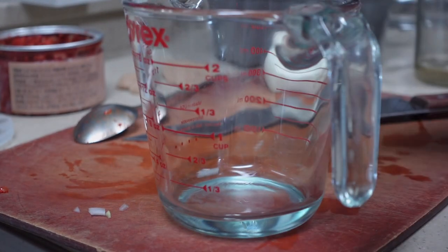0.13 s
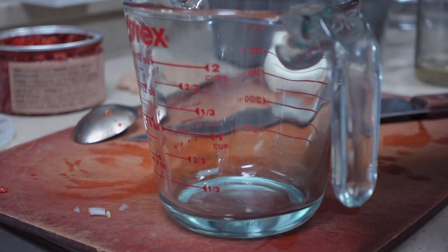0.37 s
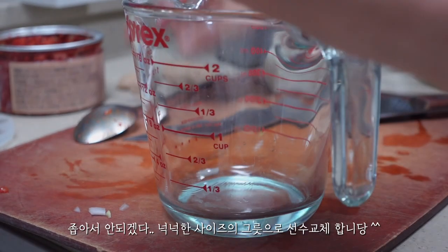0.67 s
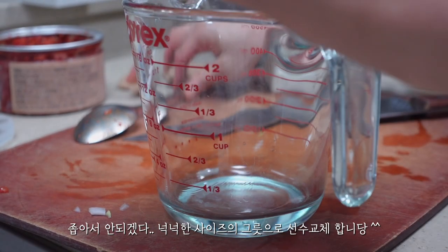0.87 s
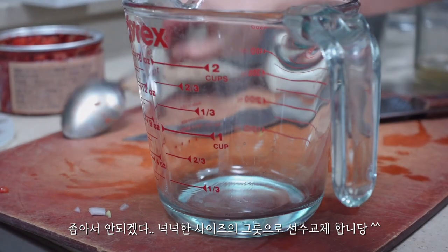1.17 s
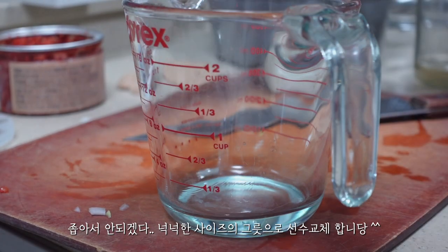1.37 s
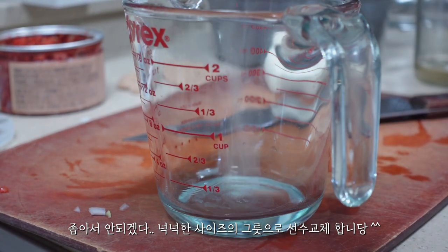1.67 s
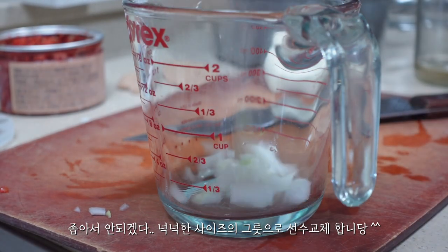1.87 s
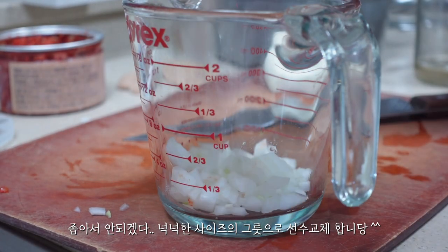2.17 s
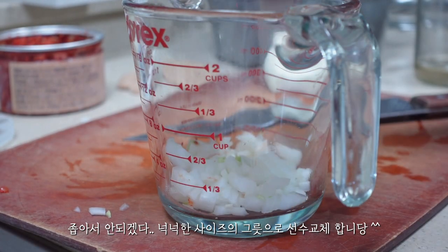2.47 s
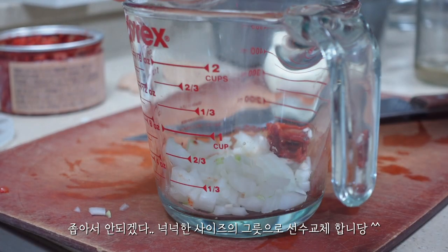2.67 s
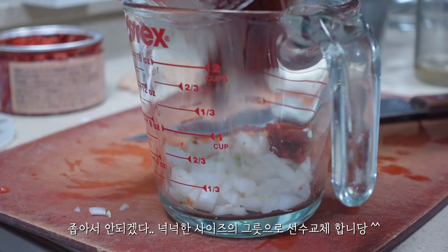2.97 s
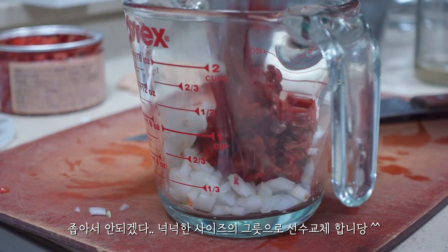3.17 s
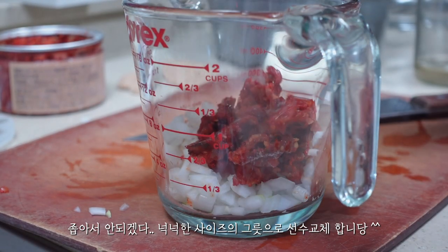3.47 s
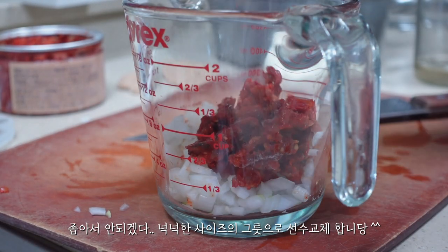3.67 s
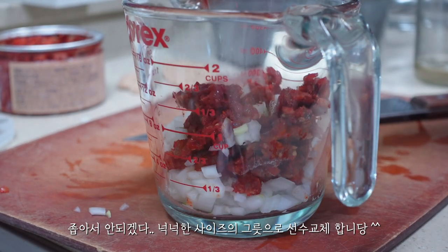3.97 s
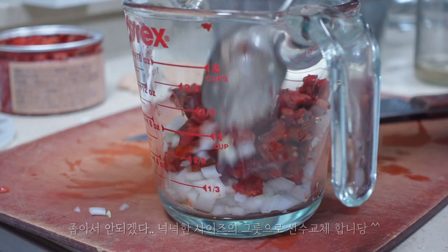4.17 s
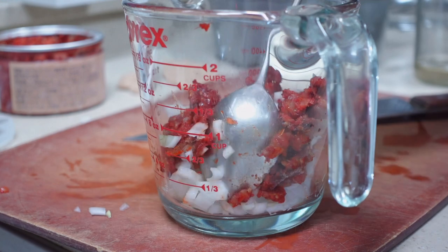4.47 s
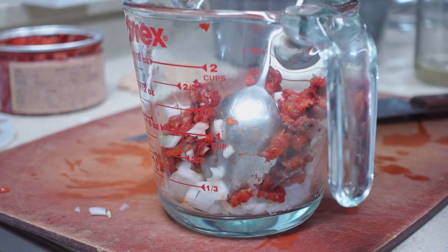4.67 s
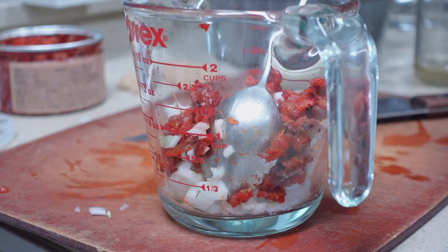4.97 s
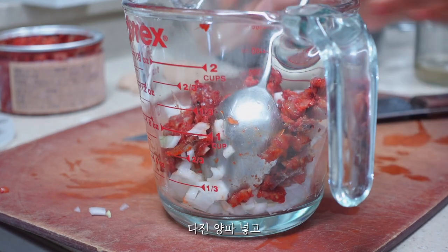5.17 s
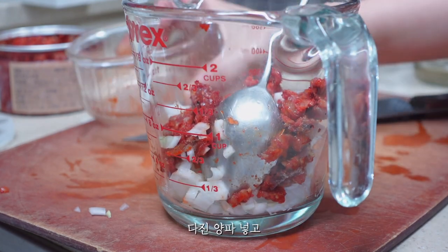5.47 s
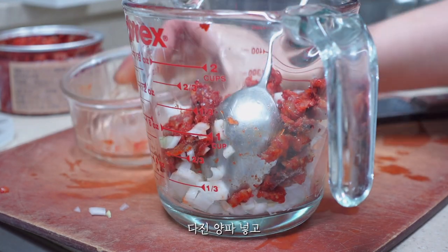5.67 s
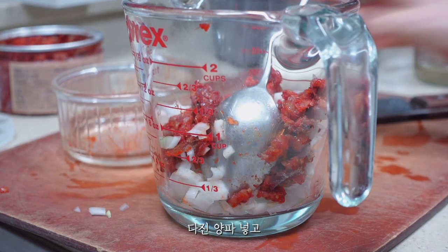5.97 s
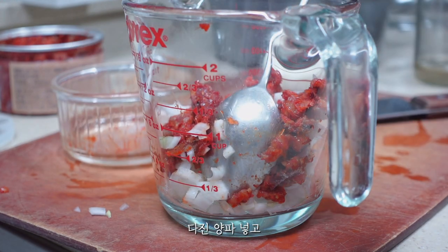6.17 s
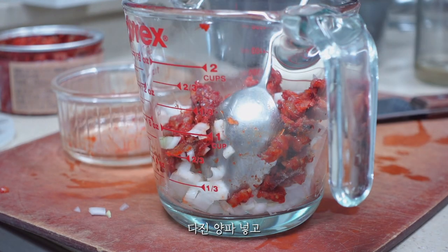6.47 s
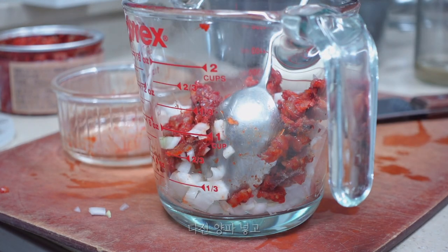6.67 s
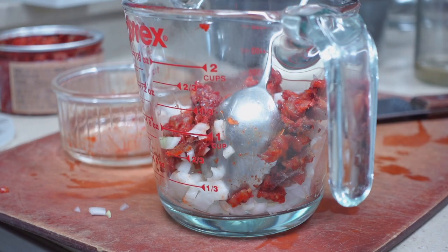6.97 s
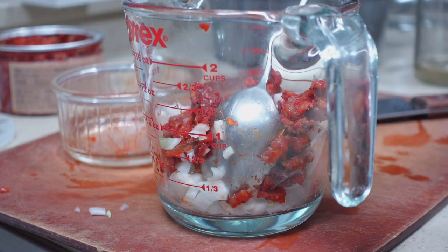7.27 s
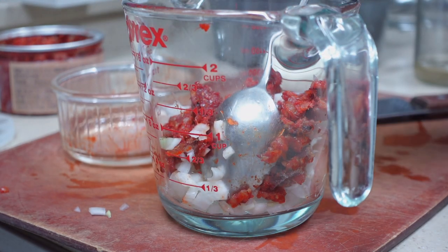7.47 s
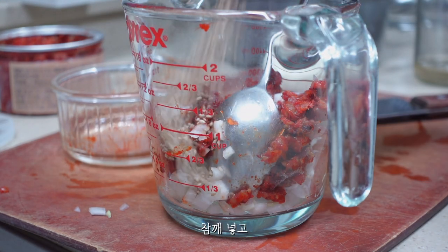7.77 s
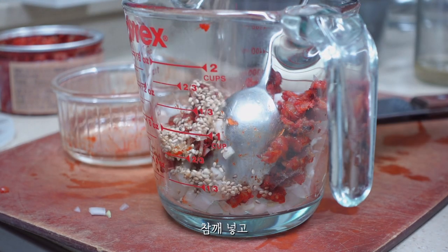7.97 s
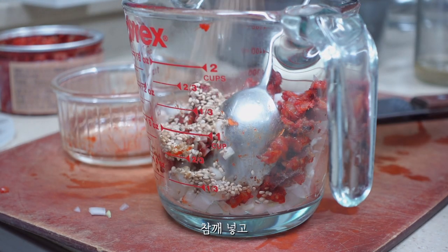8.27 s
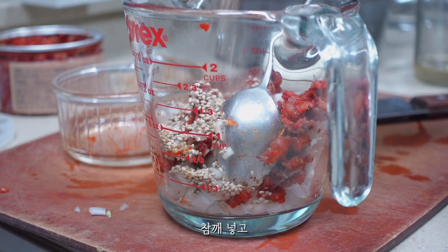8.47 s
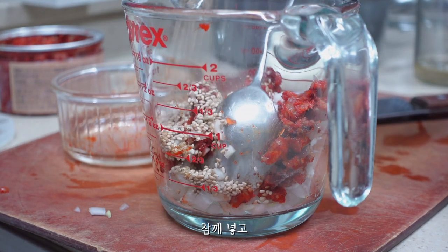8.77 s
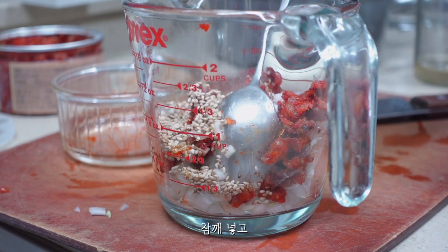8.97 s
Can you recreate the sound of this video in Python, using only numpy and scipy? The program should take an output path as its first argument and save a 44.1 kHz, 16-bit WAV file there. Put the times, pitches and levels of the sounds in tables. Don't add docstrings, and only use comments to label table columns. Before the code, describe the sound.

Close kitchen sounds: steel taps on glass, soft onion patter, sharp scraping clangs, glass dish knocking on a wooden board, then a fine seed shower.

```python
import sys
import numpy as np
from scipy import signal
from scipy.fft import rfft, irfft, next_fast_len
from scipy.io import wavfile
from scipy.ndimage import uniform_filter1d

SR = 44100
rng = np.random.default_rng(int(sys.argv[2]) if len(sys.argv) > 2 else 0)


def materialize(psi):
    bounded = np.clip(np.atleast_2d(psi).T, -1, 1)
    quanta = np.round(bounded * 32767).astype(np.int16)
    wavfile.write(sys.argv[1], SR, quanta)


def gain_from_db(level_db):
    decades = np.asarray(level_db, float) / 20
    return 10 ** decades


N = 401751
PAUSE_S = 7.072
RING_S, STROKE_S = 0.4, 1.6


def unit(x):
    return x / np.sqrt(np.mean(x ** 2) + 1e-30)


def colour(x, points):
    hz, db = np.transpose(points)
    size = next_fast_len(x.shape[-1])
    f = np.maximum(np.arange(size // 2 + 1) * SR / size, 1)
    gain = gain_from_db(np.interp(np.log(f), np.log(hz), db))
    return irfft(rfft(x, size) * gain, size)[..., :x.shape[-1]]


def pair(size, alike):
    mid, side = rng.standard_normal((2, size))
    c = np.clip(alike, 0, 1)
    spread = np.sqrt(1 - c) * side * np.array([[1], [-1]])
    return (np.sqrt(1 + c) * mid + spread) / np.sqrt(2)


def add(out, x, s):
    i = int(round(s * SR))
    out[i:i + len(x)] += x[:len(out) - i]


def gripped(hz, db, t60_s, free):
    return list(zip(hz, db, free * np.array(t60_s)))


def ring(modes):
    hz, db, t60_s = (c[:, None] for c in np.transpose(modes))
    t = np.arange(int(SR * RING_S)) / SR
    sign = (-1) ** np.arange(len(hz))[:, None]
    fade = gain_from_db(db - 60 * t / np.clip(t60_s, .005, .6))
    y = np.sum(sign * np.sin(2 * np.pi * hz * t) * fade, axis=0)
    return y / np.abs(y).max()


def strike(contacts):
    out, t = np.zeros(N), np.arange(int(SR * RING_S)) / SR
    for modes, hz, t60_s, ring_db, rows in contacts:
        body = ring(modes)
        band = signal.butter(2, [hz / 2.21, min(hz * 1.68, .45 * SR)], "band", fs=SR)
        haze = gain_from_db(ring_db - 27.0 - 60 * t / 0.9)
        fade = (gain_from_db(-60 * t / max(t60_s, .002)) + haze) / 2.5
        for s, peak_db in rows:
            crack = signal.lfilter(*band, rng.standard_normal(len(t)))
            crack = crack * fade / crack.std()
            add(out, gain_from_db(peak_db - 4.0) * (crack + gain_from_db(ring_db) * body), s)
    return out


def effort(t, rise_s, fall_s, pushes):
    s, db = np.transpose(pushes)[:, :, None]
    away = np.where(t < s, (s - t) / max(rise_s, .002), (t - s) / max(fall_s, .002))
    swell = np.sqrt(np.sum(gain_from_db(db - 20 * away) ** 2, axis=0))
    return swell * ((t < PAUSE_S) | (t[0] > PAUSE_S))


def rub(stroke, modes, ring_db, slips_hz, uneven_db, flurry_db=2.0):
    (touch_s, rise_s, fall_s, pushes), points = stroke
    t = max(touch_s, 0) + np.arange(int(STROKE_S * SR)) / SR
    chance, side, size = rng.random((3, len(t)))
    slips = (chance < slips_hz / SR) * np.sign(side - .5) * gain_from_db(-uneven_db * np.log(1.01 - size))
    steps = np.repeat(rng.standard_normal(len(t) // 400 + 1), 400)[:len(t)]
    flurry = uniform_filter1d(steps, size=200)
    force = effort(t, rise_s, fall_s, pushes) * gain_from_db(flurry_db * flurry)
    patch_db, patch_s = 3.5, 0.025
    knots, rung, energy = np.arange(t[0], t[-1] + patch_s, patch_s), 0, 0
    for hz, db, t60_s in modes:
        r, w = gain_from_db(-60 / max(t60_s, .005) / SR), 2 * np.pi * hz / SR
        patch = gain_from_db(np.interp(t, knots, patch_db * rng.standard_normal(len(knots))))
        resonator = [gain_from_db(db) * np.sin(w)], [1, -2 * r * np.cos(w), r * r]
        rung = rung + signal.lfilter(*resonator, slips * force * patch)
        energy += gain_from_db(db) ** 2 / 2 / (1 - r * r)
    rung = rung * gain_from_db(ring_db) / np.sqrt(energy * np.mean(slips ** 2))
    return rung + unit(colour(slips, points)) * force, t[0]


def rub_all(rows):
    out = np.zeros(N)
    for row in rows:
        add(out, *rub(*row))
    return out


# (frequency [Hz], level [dB per Hz])
AIR = [(25, -26.5), (238, 2), (568, -7), (1280, -4.5), (2210, -7.5), (3320, -19), (15200, -29.5),
       (16500, -45.5)]
# (time [s], level [dB])
AIR_LEVEL = [(0.0, -56.5), (7.0, -57.5), (9.11, -57.5)]


def air():
    s, db = np.transpose(AIR_LEVEL)
    swell_db = np.interp(np.arange(N) / SR, s, db - db.min())
    return unit(colour(pair(N, 0.56), AIR)) * gain_from_db(-58.5 + swell_db)


# (frequency [Hz], level [dB], t60 [s])
BOARD = [(156.5, 21, 0.072), (414, -2, 0.23), (747, -6.5, 0.024)]
# (frequency [Hz], level [dB])
SETTLE = ((0, .01, 0.17, [(0.0, -44.5)]), [(47, -40), (80, -1.5), (232, -7), (661, -19.5), (2110, -28.5),
           (4000, -35), (5200, -46), (8800, -120)])
ONION = ((1.725, 0.022, 0.16, [(1.727, -40.5), (1.85, -46), (1.96, -42.5), (2.12, -51), (2.3, -56)]),
          [(80, -49), (140, 2.5), (258, -8.5), (742, -1.5), (1490, -10.5), (2320, -6), (5630, -13),
          (15500, -20.5)])
ROCK = ((6.15, 0.029, 0.16, [(6.19, -38), (6.3, -31.5), (6.51, -48.5), (6.607, -47.5)]), [(47, -64),
         (80, -55), (145, 9.5), (307, 1.5), (498, 4.5), (709, -1), (7010, -18), (15500, -33.5)])
HAUL = ((6.75, 0.13, 0.11, [(6.82, -35), (6.9, -40), (6.98, -38), (7.055, -38.5)]), [(50, -39), (250, 4.5),
         (800, 2.5), (1500, -3.5), (3000, -11.5), (15500, -45)])


def board_rubs():
    return rub_all([(SETTLE, BOARD, -25, 5000, 2.1), (ONION, BOARD, -14, 4000, 2.5),
                    (ROCK, BOARD, -8, 1500, 2.5), (HAUL, BOARD, -14, 5000, 1.8, 1.5)])


SPOON_HZ = [1992, 2840, 4466, 4510, 4600, 5500, 7590, 11400, 13950]
SPOON_T60 = [.28, .15, .23, .12, .14, .07, .17, .12, .09]
TIP_DB = [-5, -3, 14.5, 4, -9.5, -27, -22, -11, -22]
TIP = gripped(SPOON_HZ, TIP_DB, SPOON_T60, .55)
HELD_HZ = [1529, 1988, 2805, 4468, 4515, 5550, 5700, 6400, 7590, 7634, 8680, 10560, 11400, 13950]
# (frequency [Hz], level [dB], t60 [s])
LAID = [(3860, -9, 0.087), (4870, 10, 0.16), (8000, 1, 0.05)]
SLAP = list(zip(HELD_HZ, [-14.0, -1.5, -35.5, -2.0, -5, -7.5, 3.0, -30, 2.5, -8.5, -7.5, -36.5, -17, -21.5],
        [0.068, 0.11, .1, 0.28, 0.12, 0.064, .035, .1, 0.046, 0.13, 0.066, 0.081, .1, 0.13]))
SHAKE = list(zip(HELD_HZ, [-30, -3.5, -1.0, -4.5, 1.0, -5, -13.5, -11, -6.0, -13.5, -29.5, -24, -25, -35],
         [.05, 0.037, 0.083, 0.24, 0.056, .05, 0.042, 0.098, 0.061, 0.09, .1, 0.089, .1, .08]))
PRESSED = [(4468, -2, 0.1), (2800, -6, .05), (7700, -4, .04), (12500, -17, 0.04)]
DRAWN = [(4468, -6, .06), (6450, 0, .09), (7650, -3, .05), (10700, 0, .06)]
# (frequency [Hz], level [dB])
SLIDE = ((.88, 0.044, 0.046, [(.956, -42.5)]), [(120, -50), (200, -28), (397, -4.5), (613, -14),
          (1690, -9.5), (5070, -25), (15000, -49)])
CHATTER = ((1.5, .01, 0.026, [(2.452, -46), (2.475, -48.5), (2.515, -53.5), (2.545, -52.5)]), [(900, -32.5),
            (1500, -14.5), (4500, 8.5), (5600, 9.5), (9000, -12), (15500, -29.5)])
DRAW = ((3.2, 0.031, 0.027, [(3.615, -38), (3.635, -42)]), [(400, -28), (1300, -1.5), (3000, -9),
         (8000, -29), (15500, -46)])
SCRAPE = ((3.425, 0.037, 0.087, [(3.44, -28), (3.49, -41), (3.53, -40.5)]), [(240, -58.5), (400, -31.5),
           (1280, 0.5), (3460, -11.5), (4660, -10), (7790, -13.5), (12300, -23.5), (15500, -61)])
SWIPE = ((2.8, 0.02, 0.02, [(3.644, -28.5)]), [(470, -51), (800, -35), (4600, 14), (4950, -10),
          (11000, -13), (13500, -8), (15500, -49.5)])
FLICK = ((3.765, .025, 0.042, [(3.783, -24)]), [(470, -54.5), (800, -49), (2100, 7.5), (3410, -11),
          (4540, 5.5), (7640, -13.5), (15500, -33)])


def spoon_scrapes():
    return rub_all([(SLIDE, LAID, -15, 6000, 2.1), (CHATTER, SLAP, 3, 3000, 2.2),
                    (SCRAPE, PRESSED, -6, 5000, 2.2, 1.5), (DRAW, DRAWN, 0, 4000, 2.5),
                    (SWIPE, SHAKE, -10, 6000, 2.5), (FLICK, TIP, -10, 6000, 2.5)])


EDGE_DB = [4.5, -30.5, -18, 7, -5, -6.5, 1, -12, -8]
EDGE = gripped(SPOON_HZ, EDGE_DB, SPOON_T60, .6)
# (frequency [Hz], level [dB], t60 [s])
TOUCH = [(2100, -6.5, 0.36), (4466, -1, 0.18), (7590, 1, .08)]
STOPPER = [(4470, 7, 0.055), (4700, -10, .03)]
DIG = list(zip(HELD_HZ, [-17.0, 0.5, -13, 2, -19.0, -23.0, -21, -19, -20.5, -24.5, -16, -6.5, -13.5, -18],
       [0.064, 0.031, .1, 0.15, .06, .1, .12, 0.069, .1, .1, .09, 0.11, 0.19, .08]))
CHIME = list(zip(HELD_HZ, [-35, 0, -27, -13, -14, -24, -24, -40, -3, -12, -40, -26, -16, -24],
         [.1, .33, .2, .15, .06, .1, .12, .1, .2, .12, .1, .1, .12, .08]))
# (modes, crack centre [Hz], crack t60 [s], ring [dB], [(time [s], level [dB])])
SPOON_TAPS = [ (LAID, 1880, 0.12, -18, [(1.15, -42), (1.204, -28)]),
              (LAID, 4400, 0.0024, -53, [(1.185, -20.5), (1.248, -3.5)]),
              (TOUCH, 2200, 0.033, -10, [(3.011, -22)]), (EDGE, 2100, 0.026, -0.43, [(2.29, -37.5)]),
              (STOPPER, 4400, 0.01, 4.3, [(7.098, -56), (7.154, -49.5)]),
              (STOPPER, 7300, 0.12, -32, [(7.192, -51), (7.205, -46)]),
              (TOUCH, 5400, 0.037, -12, [(4.992, -21.5)]), (EDGE, 2500, 0.035, -21, [(8.479, -33)]),
              (SLAP, 4600, 0.012, 0, [(2.442, -10.5)]), (SLAP, 1840, 0.024, -1.1, [(2.511, -23.5),
              (2.574, -38), (2.682, -45)]), (TIP, 9300, 0.0046, 2, [(2.84, -17)]),
              (DIG, 6700, .012, -7, [(3.4255, -11), (3.72, -36)]), (DIG, 1940, 0.03, -5, [(3.43, -5.5),
              (3.522, -29)]), (SHAKE, 2200, 0.034, 1.9, [(3.644, -11)]),
              (CHIME, 2500, 0.017, -2.9, [(3.099, -22), (3.781, -25.5), (3.7885, -14)]),
              (TOUCH, 3300, 0.0069, -29.5, [(3.6445, -9), (3.7885, -3.5)]),
              (TOUCH, 1800, 0.04, -1.2, [(4.57, -44.5)])]


def spoon_taps():
    return strike(SPOON_TAPS)


BOWL_HZ = [1287, 1416, 1800, 2143, 3318, 3722, 4510, 5392, 6345, 7280, 7490, 7535, 8030, 9670, 10290, 11220,
           13420]
BOWL_T60 = [.23, .22, .1, .13, .23, .17, .14, .27, .17, .12, .15, .16, .17, .11, .13, .12, .08]
SIDE_DB = [3, -19, -17, -27, -5, 6, -14, -13, -10, -30, -7, -16, -3, -24, -30, -24, -36]
FOOT_DB = [-1, -22.5, -14.5, -33, -21, 2.5, -15, -1.5, -0.5, -28, -9.5, -15, -3, -30, -35, -24, -18]
LIP_DB = [-13.5, -18, -13, -29, -6, 4.5, -0.5, -3, -2.5, -6, -3, -10, -9, -18, -11, -7.5, -8]
SIDE = gripped(BOWL_HZ, SIDE_DB, BOWL_T60, .8)
FOOT = gripped(BOWL_HZ, FOOT_DB, BOWL_T60, .65)
LIP = gripped(BOWL_HZ, LIP_DB, BOWL_T60, .5)
# (frequency [Hz], level [dB], t60 [s])
CUP = [(7520, -2, 0.16), (9430, -5, 0.29), (12600, -24, .08), (14600, -10, 0.11)]
CUBES = [(757, 1.5, .06), (2310, 0.5, 0.059), (4460, -13, .03)]
NESTED = [(2600, -8, .04), (4043, 0, .08), (5895, 0, .07)]
CLANG = list(zip(BOWL_HZ, [0.0, -8.5, -22, -10, -9, -14.5, -4.5, -27, -26.5, -26.5, -18.0, -28, -20.5, -24.0, -29.5, -35, -37],
         [0.24, 0.15, .1, 0.13, 0.32, .25, 0.16, 0.42, 0.29, 0.22, 0.18, 0.13, 0.25, 0.19, 0.24, .15, 0.087]))
CLINK = list(zip(BOWL_HZ, [-5, -24, -14, -14, -3, -10, -9, -6, -24, -16, -11, -8, -20, -27, -24, -22, -34],
         [.21, .2, .09, .1, .28, .2, .28, .36, .17, .11, .09, .08, .2, .12, .13, .1, .08]))
STACKED = list(zip(BOWL_HZ, [-8.5, -14, -13.5, -43, -7.5, 2, -13, -13.5, -8.5, -25, -11, -2.5, -6, -19, -35, -14, -20],
           [0.1, 0.084, 0.07, .1, .16, 0.23, 0.085, 0.2, 0.11, .12, 0.13, 0.17, 0.3, .12, .1, .18, .08]))
BASE = [(1090, 1, .03), (1640, -1.5, .04), (2122, -4, .03), (3200, -8.5, .03), (4480, -8.5, 0.04)]
# (modes, crack centre [Hz], crack t60 [s], ring [dB], [(time [s], level [dB])])
GLASS_TAPS = [ (CUP, 4560, 0.044, -14, [(1.727, -11.5)]), (CUBES, 5600, 0.017, -9.5, [(1.954, -20),
              (1.9835, -23), (2.0955, -23.5)]), (NESTED, 2900, .012, 0, [(5.084, -22), (5.104, -29)]),
              (CUBES, 3800, 0.031, -5, [(1.81, -25.5), (1.859, -29), (2.013, -44), (2.036, -27.5),
              (2.139, -45), (2.169, -34), (2.256, -36.5), (2.389, -40.5)]),
              (CLANG, 460, 0.081, 14.9, [(2.84, -20.5)]), (BASE, 2100, .25, -20, [(2.84, -16.5)]),
              (CLINK, 2370, 0.036, -2.6, [(3.099, -6.5)]), (FOOT, 2300, 0.092, -9, [(3.065, -26),
              (3.229, -46)]), (SIDE, 1900, 0.038, -2.6, [(4.917, -32.5), (4.94, -41)]),
              (STACKED, 4500, .02, 4.6, [(5.084, -18), (5.104, -24)]),
              (FOOT, 5600, 0.017, -12, [(4.226, -31)]), (LIP, 7900, 0.021, -0.4, [(8.097, -5)])]


def glass_taps():
    return strike(GLASS_TAPS)


# (note [Hz], t60 [s], [(time [s], level [dB])])
KNOCKS = [
    (157, 0.12, [(1.819, -42), (1.859, -42), (2.0, -43), (2.86, -34.5), (3.11, -39.5), (3.43, -47.5), (4.246, -45.5), (5.869, -37.5), (6.199, -28.5), (8.11, -50)]),
    (395, 0.069, [(2.845, -24.5), (2.899, -29), (3.1, -31.5)]),
    (432, 0.12, [(6.381, -23), (6.407, -20)]),
    (499, 0.076, [(6.177, -23), (6.319, -17), (6.339, -25)]),
    (605, .1, [(2.843, -24)]),
    (536, 0.061, [(5.719, -43), (6.282, -27), (6.296, -16.5)]),
]


def board_knocks():
    out, t = np.zeros(N), np.arange(int(SR * RING_S)) / SR
    for hz, t60_s, rows in KNOCKS:
        note = ring([(hz, 0, t60_s)]) * (1 - np.exp(-t / 0.0014))
        for s, peak_db in rows:
            add(out, gain_from_db(peak_db - 3.5) * note, s)
    return out


# (frequency [Hz], level [dB])
PASTE = ((3, 0.069, 0.22, [(4.248, -50)]), [(59, -39), (100, -9.5), (233, -3.5), (319, -18), (362, -20.5),
          (7890, -30), (15500, -40)])
LEAN = ((4.33, 0.055, 0.027, [(4.374, -53.5)]), [(590, -47), (1000, -22), (1290, 0), (3740, -35),
         (15500, -7)])
NUDGE = ((8.63, 0.044, 0.049, [(8.665, -46), (8.71, -36.5), (8.78, -52), (9.02, -60)]), [(410, -64),
          (1300, -9), (2400, -22), (3500, 4), (4130, -13), (4520, 11.5), (5020, -29), (15500, -37.5)])


def bowl_rubs():
    return rub_all([(PASTE, FOOT, -18, 6000, 2.1), (LEAN, SIDE, 6, 6000, 2.1),
                    (NUDGE, LIP, -1, 6000, 2.1)])


# (frequency [Hz], level [dB], t60 [s])
DISH = [(1109, 0.5, 0.016), (1364, 3, 0.022), (1677, -4, 0.03), (2480, -11, 0.037)]
SKID = [(700, 2, .03), (1500, 0, .035), (2050, -3, .03), (2900, -9, .025), (3600, -8, .03),
        (5500, -14, .03)]
# (frequency [Hz], level [dB])
RATTLE = ((5.665, 0.045, 0.096, [(5.687, -23), (5.725, -22.5), (5.83, -31.5)]), [(88, -48), (150, -8),
           (607, 13), (796, 12.5), (2020, 19.5), (2700, 2.5), (5230, -11), (15500, -84)])
DRAG = ((6.635, 0.1, 0.088, [(6.655, -36.5), (6.708, -33), (6.78, -49.5), (6.86, -50.5)]), [(60, -26),
         (250, -4), (700, 0), (1350, -6), (1830, -5), (3670, -8), (15500, -43.5)])


def dish_rubs():
    return rub_all([(RATTLE, DISH, -12, 4000, 1.8, 1.5), (DRAG, SKID, -6, 7000, 1.6, 1.5)])


LID_HZ = [2003, 2850, 3400, 5640, 5740, 6665, 8662]
LID = list(zip(LID_HZ, [-1, 0, -4, -1, -2, -7, -8], [.5, .36, .06, .14, .25, .26, .1]))
JAR = [(6430, -17, 0.12), (6750, 13, 0.088), (6940, -1, .04), (9060, 7, 0.11), (9750, 3, 0.082),
       (11000, -2, .06)]
# (modes, crack centre [Hz], crack t60 [s], ring [dB], [(time [s], level [dB])])
COUNTER_TAPS = [
    (LID, 5000, 0.2, -5.5, [(5.8107, -8)]),
    (LID, 5400, 0.075, -21, [(6.1833, -17), (6.2816, -13.5)]),
    (DISH, 1560, 0.018, 0.99, [(5.667, -4.5), (6.378, -25), (6.402, -23), (6.408, -18.5)]),
    (DISH, 1070, 0.023, 1.5, [(5.686, -9), (5.696, -9.5), (5.705, -6), (5.716, -25), (5.7235, -37), (5.734, -24), (5.816, -12.5)]),
    (BASE, 2070, 0.085, -1.4, [(6.162, -20.5), (6.18, -19), (6.299, -24)]),
    (BASE, 1260, 0.052, -0.81, [(6.283, -10.5), (6.34, -18)]),
    (SKID, 1700, 0.12, -3.5, [(6.598, -31.5), (6.648, -24), (6.706, -18)]),
    (DISH, 3700, 0.029, -10, [(6.509, -26), (6.986, -30), (6.994, -30)]),
    (JAR, 9600, 0.028, -19, [(7.6248, -27), (7.6984, -18), (8.2417, -26.5), (8.3422, -35), (8.3816, -35.5), (8.6191, -31), (9.076, -45)]),
]


def counter_taps():
    return strike(COUNTER_TAPS)


# (frequency [Hz], level [dB], t60 [s])
JAR_NECK = [(4540, -3, 0.026), (7180, -2, 0.032), (9200, -6, 0.022), (10100, -11, 0.031)]
# (frequency [Hz], level [dB])
TILT = ((7.265, 0.17, 0.073, [(7.3, -66.5), (7.4, -72), (7.51, -66), (7.58, -67)]), [(1760, -55),
         (3000, -63), (4530, -14), (5530, -19), (15500, -19)])
HEAP = ((7.4, .1, .05, [(7.5, -71), (7.56, -58.5), (7.6, -58)]), [(3500, -54), (4250, -15), (4650, -4),
         (5100, -29), (15500, -36)])
POUR = ((7.604, 0.035, 0.078, [(7.612, -33.5), (7.635, -34), (8.4, -59)]), [(880, -64), (1500, -36),
         (1880, -45), (2100, -4), (3060, -36), (5880, -1.5), (6690, 12.5), (16000, -7.5)])


def jar_rubs():
    return rub_all([(HEAP, JAR_NECK, -10, 5000, 2.1), (TILT, JAR_NECK, 3, 5000, 2.1),
                    (POUR, JAR, -1, 6000, 2.4, 1.2)])


# (frequency [Hz], width [Hz], level [dB])
SEED_RING = [(2630, 26, 8.5), (3850, 39, 9), (4500, 53, 14), (5410, 50, 3), (6970, 130, 12),
             (7560, 58, 20.5), (8730, 150, 6), (9700, 54, 14.5), (10350, 75, 17), (11400, 81, 10),
             (13200, 120, 11)]
# (frequency [Hz], level [dB])
SHOWER = ((7.63, 0.1, 0.17, [(7.715, -42)]), [(880, -55), (1500, -45), (2540, -5.5), (3100, -33),
           (3730, -3.5), (6370, -5.5), (11100, 0), (16000, -17.5)])
SEEDS = ((7.68, 0.92, 0.44, [(7.78, -57.5), (8.1, -57), (8.5, -56.5), (8.85, -57.5), (9.0, -71.5)]),
          [(880, -35), (1500, -18), (2610, -13), (3310, -15), (3840, -4.5), (6060, -6), (7540, -2.5),
          (16000, -14)])


def seed_trickle():
    seeded = [(hz, db, 1.0 / width_hz) for hz, width_hz, db in SEED_RING]
    return rub_all([(SHOWER, seeded, -2, 4000, 2.4, 1.5), (SEEDS, seeded, -.5, 4000, 2.4)])


# (time [s], level [dB])
PAN = [(0, 0.5), (6.3, 0.5), (6.7, -3), (7.071, -2), (7.1, -0.9), (9.11, 1)]


def kitchen(dry):
    near_db, near_t60_s = -7.5, 0.041
    room_db, room_t60_s, room_dull_hz, room_alike = -13.5, 0.32, 4930, 0.58
    t = np.arange(int(SR * RING_S)) / SR
    tail = pair(len(t), room_alike) * gain_from_db(-60 * t / room_t60_s) * (1 - np.exp(-t / 0.00028))
    tail = unit(signal.lfilter(*signal.butter(1, room_dull_hz, fs=SR), tail)) * gain_from_db(room_db)
    near = unit(np.diff(pair(len(t) + 1, 0)) * gain_from_db(-60 * t / near_t60_s)) * gain_from_db(near_db)
    echoes = (tail + near) / np.sqrt(len(t))
    cut = int(PAUSE_S * SR)
    wet = [signal.fftconvolve(part[None], echoes, axes=1)[:, :len(part)]
           for part in (dry[:cut], dry[cut:])]
    pan_db = np.interp(np.arange(N) / SR, *np.transpose(PAN))
    return (dry + np.hstack(wet)) * gain_from_db(np.array([pan_db, -pan_db]) / 2)


def scene():
    hum = air()
    taps = spoon_taps() + glass_taps() + board_knocks() + counter_taps()
    rubs = board_rubs() + spoon_scrapes() + bowl_rubs() + dish_rubs() + jar_rubs() + seed_trickle()
    no_bass = signal.butter(4, 110., "high", fs=SR, output="sos")
    return kitchen(signal.sosfilt(no_bass, taps + rubs)) + hum


def band_limit(x):
    return signal.sosfilt(signal.butter(12, 16200, fs=SR, output="sos"), x)


def record(dry):
    heard = signal.sosfilt(signal.butter(2, 14000., fs=SR, output="sos"), dry)
    return band_limit(heard)


dry = scene()
out = record(dry)
materialize(out)
```